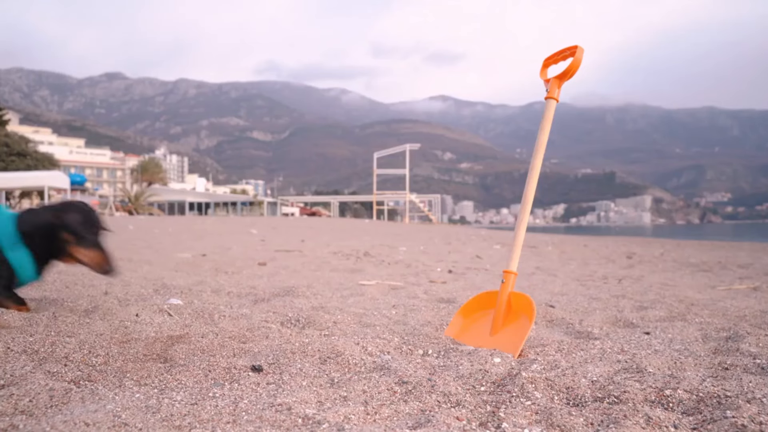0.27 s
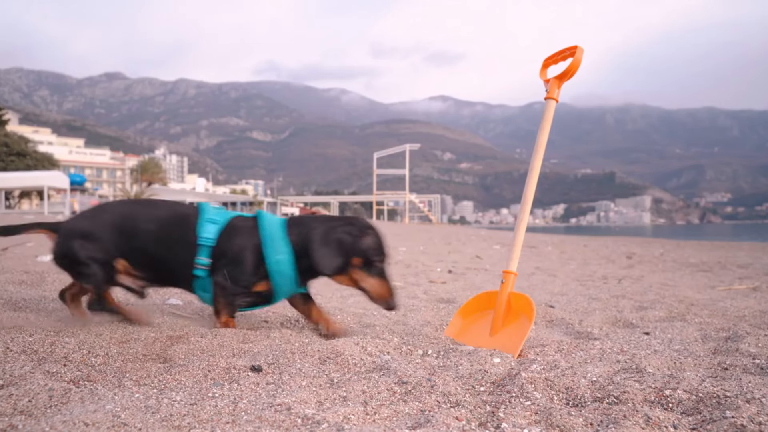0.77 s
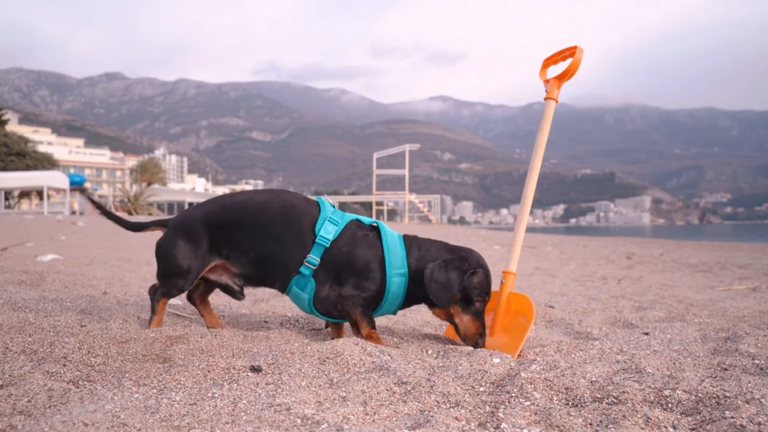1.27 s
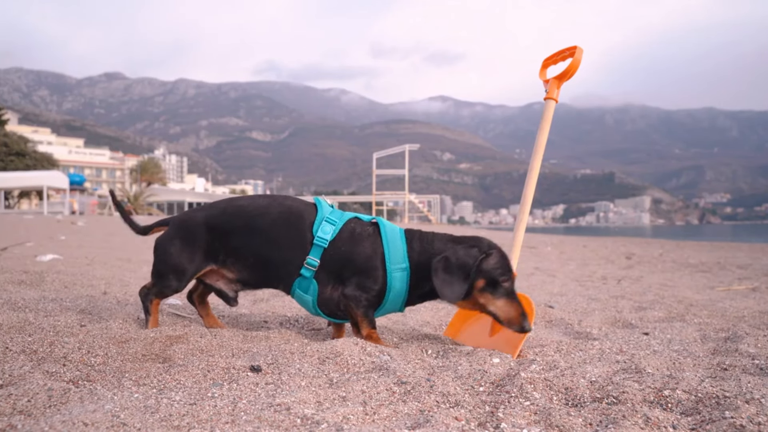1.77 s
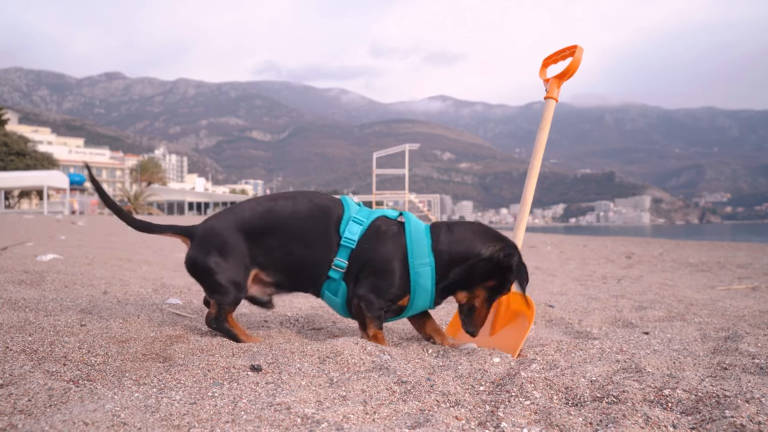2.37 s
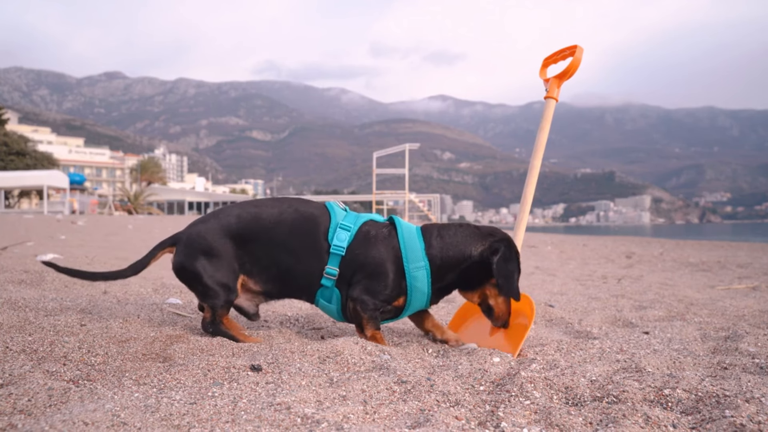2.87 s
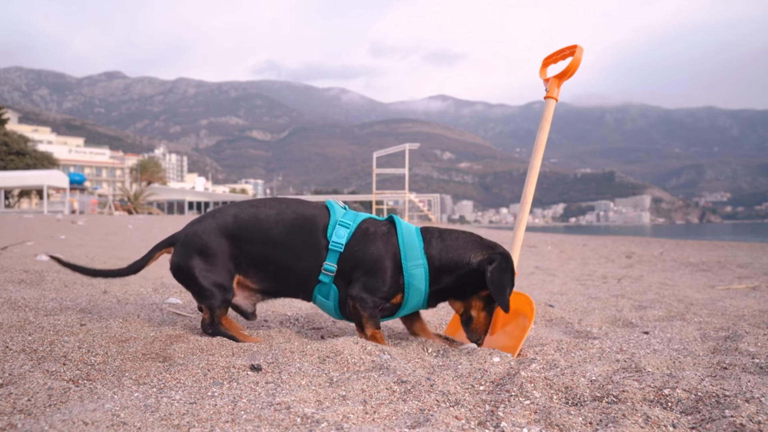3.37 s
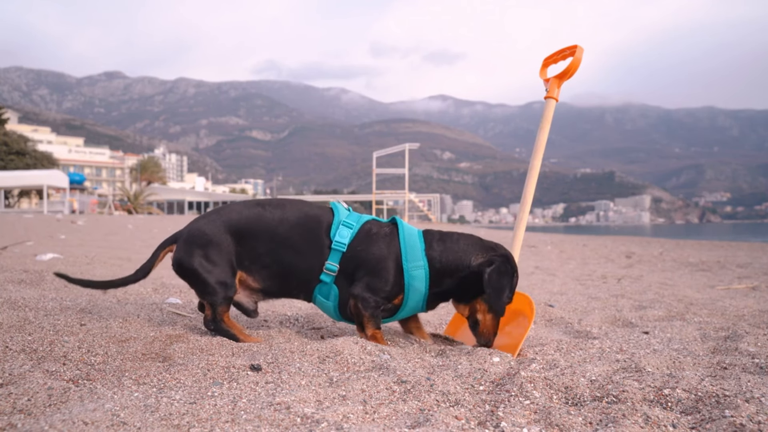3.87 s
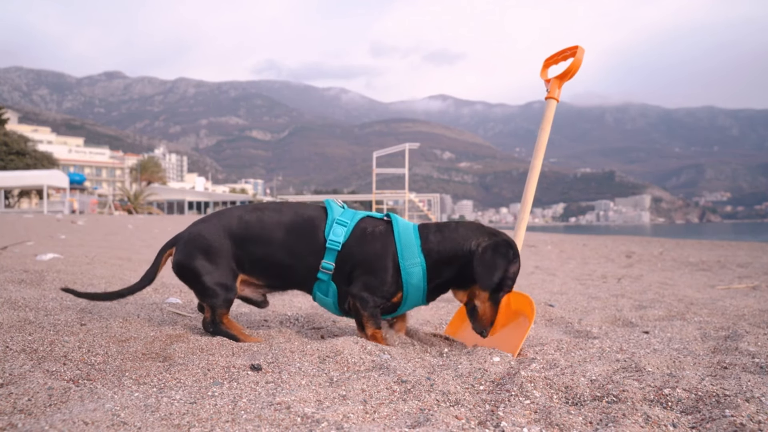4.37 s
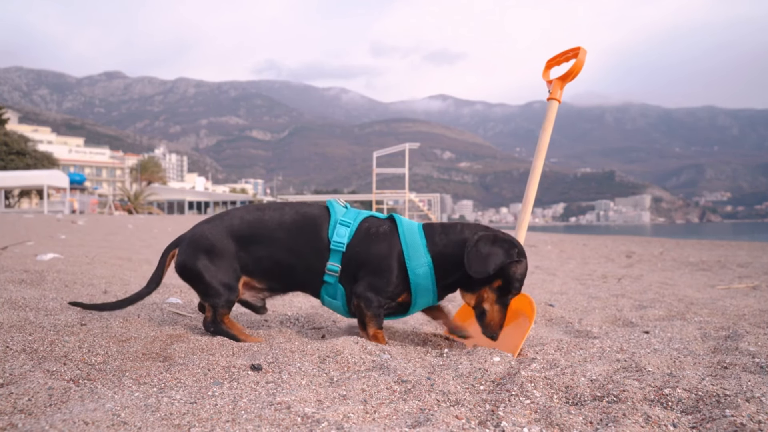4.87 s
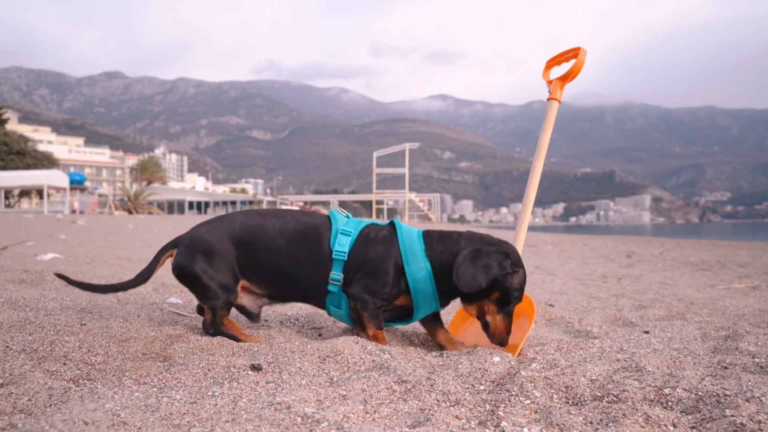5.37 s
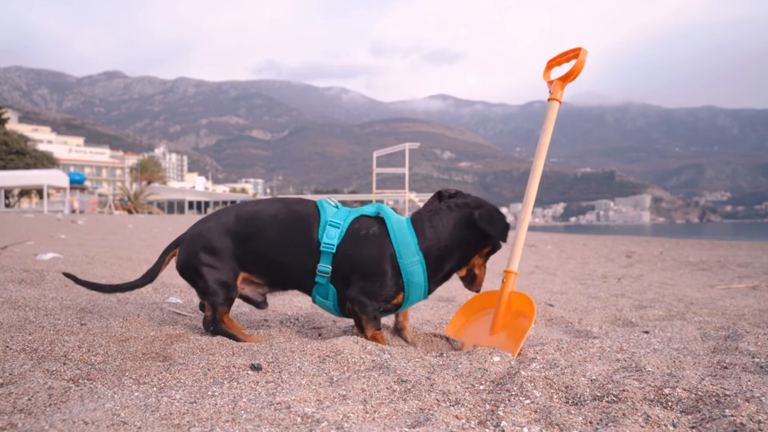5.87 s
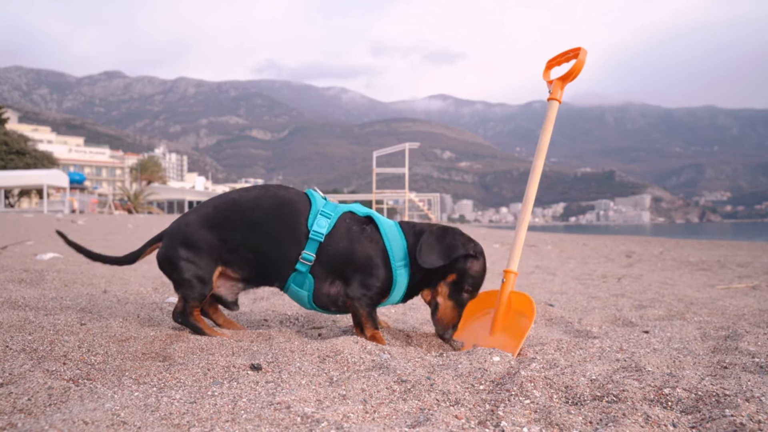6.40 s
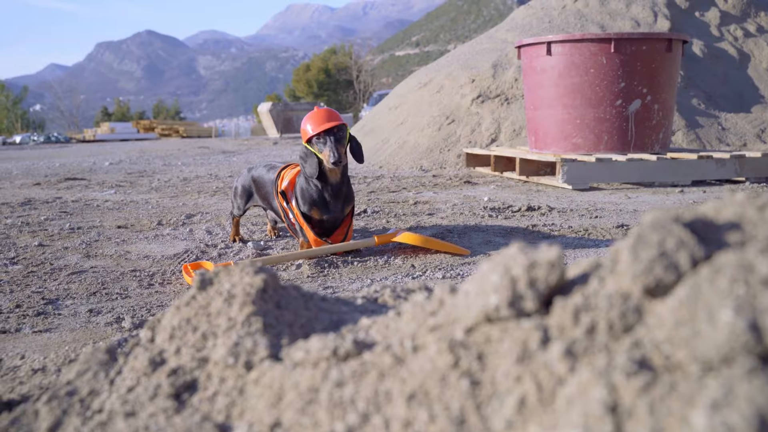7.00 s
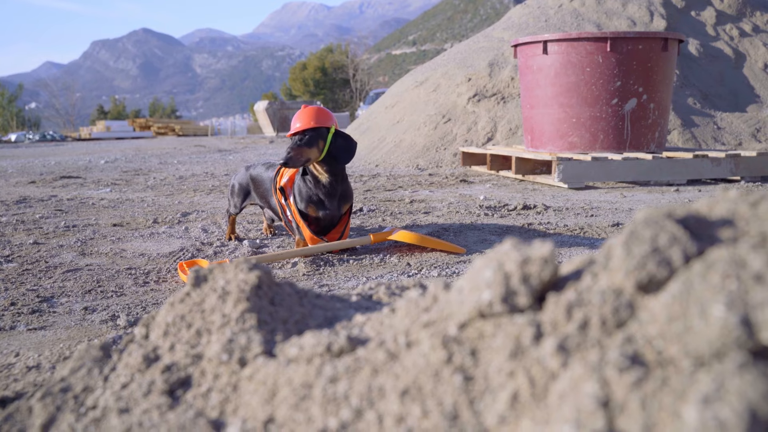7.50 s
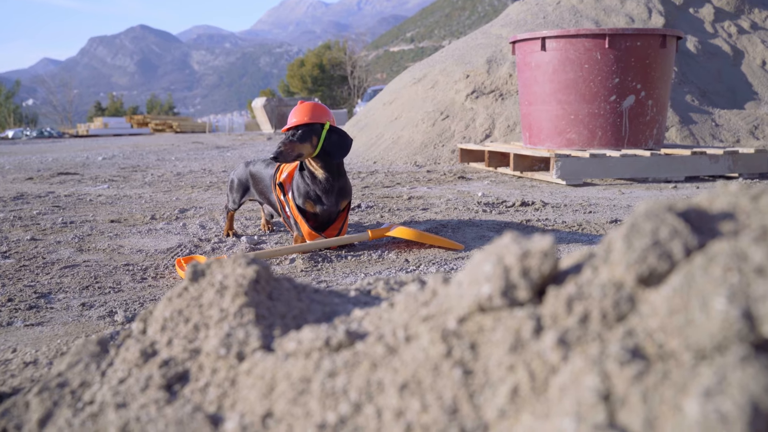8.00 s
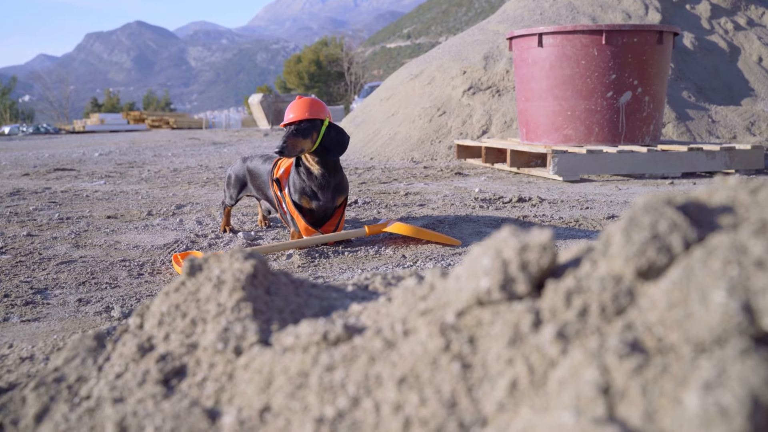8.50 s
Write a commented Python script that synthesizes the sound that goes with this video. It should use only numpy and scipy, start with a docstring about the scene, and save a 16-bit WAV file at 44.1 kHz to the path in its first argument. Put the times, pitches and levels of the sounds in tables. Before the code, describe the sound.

Close digging on a quiet beach: gritty scrapes ringing metallically, clattering pebbles, tumbling clods, and bursts of rapid hissing paw strokes through sand.

```python
"""Digging on a beach, close by, in almost still air with a faint low drone and a little wind.
First a shovel blade is shoved into gritty sand: random grain collisions, coloured and made to ring the blade.
It knocks on pebbles in short filtered bursts; damp clods tumble, loose sand slides and pebbles tick down.
Then paws rake dry sand in quick runs of hissing strokes, made of dense random grains.
Shoves and strokes go on in turn; twice the freed blade sings on as a fading tone, and the last grains settle."""
import sys
import numpy as np
from scipy import signal
from scipy.fft import rfft, irfft
from scipy.io import wavfile

SR = 44100
rng = np.random.default_rng(int(sys.argv[2]) if len(sys.argv) > 2 else 0)


def wav_record(signal):
    """Record a signal, one row per channel, as 16-bit PCM in the file named by sys.argv[1]."""
    frames = np.transpose(np.atleast_2d(signal))
    bounded = np.clip(frames, -1, 1)
    # unit amplitude maps onto the largest positive 16-bit level
    quanta = np.round(bounded * 32767).astype(np.int16)
    wavfile.write(sys.argv[1], SR, quanta)


N = 385786  # length of the scene in samples

# The tones that the blade can ring with, before sand and contact shift them:
# pitch_hz [Hz], width_hz [Hz, wider dies sooner], level_db [dB]
BLADE_MODES = [(442, 67, -8), (1020, 99, -1.5), (1424, 45, 5), (1570, 100, -8), (2015, 170, -13.5),
               (2086, 67, -1.5), (2330, 45, -9.5), (3110, 47, -4), (3435, 56, -1), (4020, 54, -5.5),
               (5650, 220, -2.5), (7700, 64, -6), (9480, 180, -1)]
# Shoves of the blade into the ground: start_s [s], end_s [s], grit_db [dB],
# fade_db [dB lost along the shove], rise_s [s], fall_s [s], fine_db [dB, fine sand over grit],
# clod_db [dB, clods over grit], clod_edge_hz [Hz, lower edge of the clods],
# ring_db [dB, ring of the blade], scatter_db [dB, spread of grain sizes]
SHOVE_TABLE = [(0.004, 0.054, -21.5, 9, 0.023, 0.008, 0, 0, 130, 8, 3),
               (0.601, 0.642, -29, -5, 0.018, 0.01, -1, -10, 220, 7.5, 2.5),
               (1.143, 1.258, -22, 5.5, 0.015, 0.063, -0.5, -8.5, 420, 1, 1.66),
               (2.676, 2.813, -31.5, 9, 0.0078, 0.088, 2, -17.5, 180, 5.5, 1.06),
               (4.043, 4.151, -33, -3.5, 0.005, 0.023, 5, -10.5, 171, 0, 1.5),
               (5.366, 5.438, -34.5, 3.5, 0.071, 0.059, -1, -19.5, 120, 10, 0),
               (6.46, 6.533, -26, 7.5, 0.0029, 0.017, 2, -14, 202.7, 11, 1.5),
               (7.039, 7.056, -29, -1.5, 0.025, 0.027, -2, -11, 400, 10.5, 2),
               (7.097, 7.148, -26.5, 2, 0.017, 0.056, -5, -6, 380, 10, 2),
               (7.329, 7.432, -38.5, 4.5, 0.066, 0.13, -4.5, -13.5, 250, 11, 1.5),
               (7.606, 7.658, -25.5, 1.5, 0.045, 0.082, -5, -2, 150, 1.5, 3.5),
               (8.129, 8.265, -31.5, 5, 0.014, 0.023, -7, -1.5, 612, -7, 1.5)]


def undb(db):
    """Turn decibels into gain."""
    return 10 ** (np.asarray(db) / 20)


def unit(x):
    """Scale to an rms (average strength) of 1."""
    return x / np.sqrt(np.mean(x ** 2))


def clock():
    """Time of every sample in seconds."""
    return np.arange(N) / SR


def walk(rate, size=N):
    """Random wandering: new values, rate per second, joined by straight lines; spread near 1."""
    steps = np.arange(size) * rate / SR
    count = int(steps[-1]) + 2
    return 1.2 * np.interp(steps, np.arange(count), rng.standard_normal(count))


def cut(x, hz, kind, order=2):
    """Keep what lies below hz ("low") or above it ("high")."""
    sections = signal.butter(order, min(hz, .45 * SR), kind, fs=SR, output="sos")
    return signal.sosfilt(sections, x)


def resonate(x, hz, width_hz):
    """One resonance, with gain 1 at its centre."""
    hz_limited = min(hz, .45 * SR)
    top, bottom = signal.iirpeak(hz_limited, hz / min(width_hz, SR / 4), fs=SR)
    return signal.lfilter(top, bottom, x)


def colour(x, points, size=2048):
    """Filter through (Hz, dB) points, never ahead of time, so that clicks keep their sharp front."""
    hz, db = np.transpose(points)
    bins = np.maximum(np.arange(size // 2 + 1), 1) * SR / size
    gain = undb(np.interp(np.log(bins), np.log(hz), db))
    # folding the cepstrum forward in time gives the filter with the earliest response
    cepstrum = irfft(np.log(gain))
    cepstrum[1:size // 2] *= 2
    cepstrum[size // 2 + 1:] = 0
    response = irfft(np.exp(rfft(cepstrum)))
    return signal.fftconvolve(x, response[None], axes=1)[:, :x.shape[1]]


def spread(x, width, treble_hz=2500, bass_hz=450, bass_share=2.1):
    """Give each grain its own direction in the treble and the bass; the middle stays central."""
    scattered = np.clip(width, 0, 1) * rng.standard_normal(len(x)) * x
    side = cut(scattered, treble_hz, "high") + bass_share * cut(scattered, bass_hz, "low")
    return np.array([x + side, x - side])


def grains(rate, scatter_db, size=N):
    """Random collisions, rate per second: many small, a few large."""
    out = np.zeros(size)
    when, strength, sign = rng.random((3, size))
    hit = when < rate / SR
    steps = np.minimum(-np.log(1 - strength[hit]), 4)
    out[hit] = undb(scatter_db * steps) * np.sign(sign[hit] - .5)
    return out


def add(out, s, sound):
    """Mix a short sound in at time s."""
    i = max(int(s * SR), 0)
    out[:, i:i + sound.shape[1]] += sound[:, :N - i]


def gesture(t, start, end, rise_s, fall_s, fade_db=0):
    """Gain that rises up to start, changes by -fade_db until end, and then dies away."""
    along = np.clip((t - start) / max(end - start, 1 / SR), 0, 1)
    before = np.maximum(start - t, 0) / rise_s
    after = np.maximum(t - end, 0) / fall_s
    return np.exp(-before - after) * undb(-fade_db * along)


def swell(t, crest, half_s):
    """Gain of a soft bell-shaped swell, about half as high at half_s from its crest."""
    return np.exp(1 - np.hypot(1, 1.37 * (t - crest) / half_s))


def still_air(level_db=-62.5, width=0.9):
    """Quiet air: coloured noise, partly different in each ear, whose level wanders."""
    # tone colour of the air: pitch_hz [Hz], level_db [dB]
    air_colour = [(25, -5), (64, -7), (108, -11), (175, -19), (223, -15.5), (624, -21), (1520, -26),
                  (4740, -31.5), (11900, -37.5), (16000, -40)]
    noise = rng.standard_normal(N) + width * rng.standard_normal((2, N))
    air = unit(colour(noise, air_colour)) * undb(level_db + walk(6.1))
    return cut(air, 9900, "low", order=1)


def drone(waver=0.012, upper_ratio=2.28, upper_db=-9):
    """A distant drone: two tones a fixed ratio apart, wavering in pitch and level."""
    # course of the lower tone, around which it wavers: time_s [s], pitch_hz [Hz], level_db [dB, both tones]
    drone_course = [(0, 122.5, -74), (4.6, 118.3, -73), (5.6, 98, -68.5), (8.702, 99.4, -69.5)]
    t = clock()
    s, hz, db = np.transpose(drone_course)
    pitch = np.interp(t, s, hz) * (1 + waver * walk(43))
    phase = 2 * np.pi * np.cumsum(pitch) / SR
    tones = np.sin(phase) + undb(upper_db) * np.sin(upper_ratio * phase)
    return unit(tones) * undb(np.interp(t, s, db) + 2 * walk(15))


def wind():
    """Soft buffets of wind on the microphone: swells of very low noise."""
    # buffets: crest_s [s], half_s [s, half length], level_db [dB]
    buffets = [(2.54, 0.029, -49), (2.637, .02, -44), (2.826, 0.059, -51), (2.916, 0.013, -47),
               (3.003, 0.022, -55.5), (3.115, 0.034, -58)]
    t = clock()
    gusts = sum(undb(db) * swell(t, crest, half_s) for crest, half_s, db in buffets)
    return unit(cut(rng.standard_normal((2, N)), 45, "low")) * gusts


def blade(x, contact_db=1.5, load=0.008, upper_db=-4, upper_width_hz=70, travel_db=3, travel_rate=22,
          drift=.008, drift_rate=16, count=20):
    """Ring of the blade: sand shifts its modes, which trade strength as the point of contact travels."""
    size = x.shape[1]
    chance = rng.standard_normal((len(BLADE_MODES), 2))
    main = 0
    for (hz, width_hz, db), (contact, shift) in zip(BLADE_MODES, chance):
        push = x * (1 + (undb(travel_db) - 1) * walk(travel_rate, size))
        main = main + undb(db + contact_db * contact) * resonate(push, hz * (1 + load * shift), width_hz)
    # the upper modes lie close together, and every contact picks out different ones
    upper = sum(resonate(x, hz, upper_width_hz) for hz in rng.uniform(2500, 14000, count))
    # as sand moves on the blade, the pitch of all modes wanders
    place = np.cumsum(1 + drift * walk(drift_rate, size))
    rings = main + undb(upper_db) * upper
    return np.array([np.interp(place, np.arange(size), ring) for ring in rings])


def stones(size, rate=60, width_hz=800, width=.14, count=14):
    """Small stones in the grit click at random, in a set of different pitches."""
    pitches = np.geomspace(1200, 11000, count) * np.exp(.1 * rng.standard_normal(count))
    clicks = np.array([resonate(grains(rate, 4, size=size), hz, width_hz) for hz in pitches])
    side = width * rng.standard_normal(count) @ clicks
    return unit(clicks.sum(axis=0) + np.array([side, -side]))


def crumble(size, edge_hz, width=.2, rate=1800):
    """Damp clods break in coarse, dull grains."""
    # tone colour of the clods: pitch_hz [Hz], level_db [dB]
    clod_colour = [(50, -16.5), (120, -5), (250, -10), (450, -5.5), (800, -0.5), (1050, -2.5), (1400, -2.5),
                   (2200, -17.5)]
    crumbs = colour(spread(grains(rate, 2.8, size=size), width), clod_colour)
    return unit(cut(cut(crumbs, edge_hz, "high"), 1800, "low", order=3))


def grind(size, fine_db, clod_db, edge_hz, ring_db, scatter_db, stones_db=-9, width=0.24, stick=0.92):
    """Grit, fine sand, small stones and clods grind along the blade and make it ring."""
    # tone colour of grit and ringing blade: pitch_hz [Hz], level_db [dB]
    grit_colour = [(590, -29.5), (1000, -9), (1180, -10), (1420, -5.5), (1870, -4.5), (2100, -7),
                   (5570, -10), (11700, -11.5), (16000, -18.5)]
    rub = spread(grains(6000, scatter_db, size=size), width)
    rub = unit(colour(rub + undb(ring_db) * blade(rub), grit_colour))
    # coarser ground holds more stones, heard as louder clicking
    rub = rub + undb(stones_db + scatter_db) * stones(size)
    grit = unit(cut(cut(rub, 1400, "high", order=3), 4900, "low", order=4))
    fine = unit(cut(cut(rub, 6000, "high", order=4), 15000, "low", order=1))
    clods = crumble(size, edge_hz)
    # the coarser the ground, the more the blade sticks and slips
    jerks = undb(stick * scatter_db * walk(110, size))
    return jerks * (grit + undb(fine_db) * fine + undb(clod_db) * clods)


def shovel(size=40000):
    """Each shove bites, grinds on through the ground and comes to rest."""
    out = np.zeros((2, N))
    for start, end, db, fade_db, rise_s, fall_s, fine_db, clod_db, edge_hz, ring_db, scatter_db in SHOVE_TABLE:
        t = max(start - .3, 0) + np.arange(size) / SR  # begins early, to leave room for the rise
        force = undb(db) * gesture(t, start, end, rise_s, fall_s, fade_db)
        add(out, t[0], force * grind(size, fine_db, clod_db, edge_hz, ring_db, scatter_db))
    return out


def settling(db=-67, settle_s=0.22):
    """With each shove the disturbed grains tick, and afterwards ever more faintly."""
    t = clock()
    unrest = sum(gesture(t, start, end, .01, settle_s) for start, end, *_ in SHOVE_TABLE)
    ticks = unit(resonate(spread(grains(320, 6), .35), 6000, 8000))
    return ticks * undb(db + 3 * walk(11)) * unrest


def knocks(thud_width_hz=430, ring_db=-3, body_db=-3.5, deep_s=.0058, ground_hz=270, ground_width_hz=110,
           ground_db=8, strike=3.2, top_hz=13000, size=6000):
    """A pebble strikes the blade and chatters on it: a crack, a thud in the ground and a short ring."""
    # knocks: start_s [s], strength_db [dB, scaled by the chatter], crack_db [dB over the thud],
    # thud_hz [Hz], crunch_s [s, time the chatter takes to die down], edge_hz [Hz, lower edge]
    knock_table = [(.008, -3.5, -16, 620, 0.0045, 70), (.049, -5.5, -11, 975, 0.0022, 60),
                   (.6407, 5.5, -4.5, 1202, 0.0039, 25), (1.131, -15.5, 1, 900, 0.0023, 150),
                   (1.145, -15, -8, 900, 0.0036, 200), (1.196, -7.5, 3, 1280, 0.003, 200),
                   (1.286, -15, -20, 1000, 0.0064, 400), (2.67, -29, 18, 1410, 0.0077, 200),
                   (4.1087, -2.5, -9, 1440, 0.0057, 170), (4.136, -8.5, 4.5, 1050, 0.0043, 120),
                   (4.157, -4.5, -3, 960, 0.0035, 201), (4.182, -25, -1.5, 1710, 0.01, 200),
                   (6.468, -13, 14, 1400, 0.0038, 200), (6.528, -17.5, 7, 850, 0.0043, 100),
                   (7.032, -11, -0.5, 1050, 0.006, 200), (7.047, -13, -18, 463, 0.0062, 200),
                   (7.126, -20.5, -10, 420, 0.0053, 90), (7.176, -21.5, -10, 1450, 0.0042, 200),
                   (7.5905, -9.5, -2, 1640, 0.0037, 300), (7.617, -10.5, -3.5, 1040, 0.0093, 400),
                   (7.66, -11.5, 1, 1400, 0.0053, 300), (7.667, 2.5, 0.5, 1010, 0.0024, 245),
                   (7.684, -14, -9, 1450, 0.0043, 400), (7.726, -6, -8, 950, .0016, 100),
                   (8.1238, 0.5, 2, 1700, 0.0023, 350), (8.2196, 5.5, -3.5, 1050, 0.00092, 500)]
    out = np.zeros((2, N))
    t = np.arange(size) / SR
    for s, db, crack_db, thud_hz, crunch_s, edge_hz in knock_table:
        chatter = rng.choice([-1, 1], size) * np.exp(-t / crunch_s) * (1 - np.exp(-t / 0.0016))
        strength = undb(db) * chatter.std()
        chatter[0] = strike * np.abs(chatter).max()  # the first strike stands out
        force = spread(chatter, .13)
        # a longer blow moves more of the ground and crushes finer, brighter grains
        depth = min(crunch_s / deep_s, 1)
        dull_force = cut(cut(force, 2200, "low"), 250, "high", order=1)
        thud = unit(resonate(dull_force, thud_hz, thud_width_hz))
        ground = undb(ground_db) * resonate(force, ground_hz, ground_width_hz)
        body = unit(cut(force, 990, "low") + ground) * depth ** 2
        ring = unit(blade(cut(force, 2300, "low", order=1)))
        crack = unit(cut(cut(force, 4100, "high"), 3400, "low"))
        blow = thud + undb(body_db) * body + undb(ring_db) * ring + undb(crack_db) * crack
        trimmed = cut(cut(blow, edge_hz, "high"), top_hz * np.sqrt(depth), "low")
        add(out, s, strength * unit(trimmed))
    return out


def tumbles(rise_s=.011, fall_s=0.013, size=15000):
    """Lifted clods drop and break up, each fall with its own range of pitches."""
    # falls: start_s [s], end_s [s], level_db [dB], low_hz [Hz, lower edge], high_hz [Hz, upper edge]
    clod_falls = [(0.05, 0.057, -35, 45, 130), (1.15, 1.22, -32, 324, 1510), (1.289, 1.295, -27, 497, 2500),
                  (1.366, 1.371, -38.5, 450, 1500), (4.112, 4.159, -25.5, 161, 743),
                  (5.445, 5.47, -50.5, 130, 493), (5.52, 5.583, -56, 130, 700),
                  (6.523, 6.535, -31.5, 111.6, 1494), (7.106, 7.133, -29.5, 109, 1104),
                  (7.461, 7.523, -31, 70, 856), (7.802, 7.815, -31, 405, 1490),
                  (7.879, 7.971, -44, 130, 498), (8.134, 8.196, -33, 407, 810)]
    out = np.zeros((2, N))
    for start, end, db, low_hz, high_hz in clod_falls:
        t = max(start - .1, 0) + np.arange(size) / SR
        clods = unit(cut(crumble(size, low_hz, width=.1), high_hz, "low"))
        add(out, t[0], undb(db) * gesture(t, start, end, rise_s, fall_s) * clods)
    return out


def slides(clod_db=-6, edge_hz=280, ring_db=7, scatter_db=2.0, size=26000):
    """A little loose sand runs off the blade under its own weight, in a soft swell."""
    # slides: crest_s [s], half_s [s, half length], grit_db [dB], fine_db [dB, fine sand over grit]
    slide_table = [(0.103, 0.035, -47.5, 1.5), (0.24, 0.017, -50, -2.5), (0.39, 0.045, -47, 0),
                   (0.497, 0.027, -49, -4), (0.711, 0.055, -47, -4), (0.909, 0.038, -50, -6.5),
                   (1.077, 0.042, -52, -3.5), (2.583, 0.035, -56, 1), (3.72, .05, -72, -5),
                   (4.247, 0.03, -52.5, -8), (4.557, 0.28, -69, -3), (5.647, 0.13, -62, 5),
                   (6.879, 0.065, -54, -0.5), (7.928, 0.036, -50.5, -6), (8.337, 0.05, -50, -12),
                   (8.565, 0.064, -56, -3)]
    out = np.zeros((2, N))
    for crest, half_s, db, fine_db in slide_table:
        t = max(crest - size / SR / 2, 0) + np.arange(size) / SR
        sand = grind(size, fine_db, clod_db, edge_hz, ring_db, scatter_db)
        add(out, t[0], undb(db) * swell(t, crest, half_s) * sand)
    return out


def pebbles(contact_s=0.0036, size=2000):
    """Loose pebbles drop back with a dry tick: a fading noise burst through a broad resonance."""
    # landings: start_s [s], strength_db [dB, scaled by the burst], pitch_hz [Hz]
    landings = [(0.324, -37.5, 7100), (0.716, -43, 3450), (0.792, -36, 1620), (2.246, -50, 1950),
                (2.35, -50.5, 4130), (5.087, -47, 806), (5.284, -40, 650), (5.368, -34, 2010),
                (5.564, -34, 2200), (5.605, -38.5, 4170), (5.855, -42.5, 4600), (5.919, -43.5, 3500),
                (7.335, -27, 1220), (7.549, -23.5, 2550), (8.68, -47.5, 4570), (8.713, -47, 6500)]
    out = np.zeros((2, N))
    t = np.arange(size) / SR
    for s, db, hz in landings:
        contact = rng.standard_normal(size) * np.exp(-t / contact_s)
        tick = resonate(spread(contact, 0.21), hz, 0.99 * hz)
        add(out, s, undb(db) * unit(tick) * contact.std())
    return out


def paws(rise_s=0.0078, fall_s=0.011, trickle_db=-27, trickle_s=0.064, bounce=0.37):
    """Each stroke shears a mass of fine grains; the thrown sand trickles down after it."""
    # strokes: start_s [s], end_s [s], level_db [dB, before the lower edge is cut],
    # fade_db [dB lost along the stroke], edge_hz [Hz, lower edge of the hiss]
    stroke_table = [(1.31, 1.388, -23, 3, 1600), (1.446, 1.563, -21.5, 4, 700),
                    (1.603, 1.711, -23.5, 0, 700), (1.76, 1.848, -22, 1.5, 704),
                    (1.868, 1.924, -34.5, -5, 700), (2.892, 2.898, -27.5, 3, 900),
                    (2.929, 2.981, -20, -1, 1200), (3.065, 3.176, -18.5, 3.5, 1100),
                    (3.246, 3.317, -18.5, 3, 1200), (4.813, 4.9, -22.5, 0.5, 2970),
                    (4.991, 5.05, -18.5, 6.5, 600), (5.13, 5.269, -19.5, 6.5, 805),
                    (6.554, 6.601, -36, 5.5, 900), (6.64, 6.712, -40.5, 5.5, 900)]
    # tone colour of dry sand: pitch_hz [Hz], level_db [dB]
    sand_colour = [(120, -60), (200, -26), (380, -31.5), (777, -27), (867, -29.5), (1530, -25), (2130, -13),
                   (3370, -7.5), (3830, -2.5), (4350, -5.5), (4860, 0), (6760, -4.5), (13100, -2.5),
                   (16000, -13)]
    t = clock()
    out = 0
    sand = unit(colour(spread(grains(26000, 2.26), 0.37, treble_hz=600), sand_colour))
    for start, end, db, fade_db, edge_hz in stroke_table:
        push = gesture(t, start, end, rise_s, fall_s, fade_db)
        trickle = undb(trickle_db) * gesture(t, start, end, rise_s, trickle_s, fade_db)
        # the wall of the hole throws the hiss back, from a different distance at each stroke
        delay = rng.integers(30, 110)  # samples
        hiss = sand + bounce * np.roll(sand, delay, axis=1)
        # a shallow stroke moves only the finest grains and lacks the lower hiss
        out = out + cut(hiss, edge_hz, "high", order=1) * (push + trickle) * undb(db)
    return out


def free_ring(damping=0.096, size=24000):
    """The blade slips free; with no sand to damp it, it sings on in its strongest mode."""
    # rings: start_s [s], level_db [dB, peak at the start]
    ring_table = [(2.671, -35.5), (5.429, -36)]
    out = np.zeros((2, N))
    t = np.arange(size) / SR
    hz, width_hz, _ = max(BLADE_MODES, key=lambda mode: mode[2])
    ring = np.sin(2 * np.pi * hz * t) * np.exp(-np.pi * width_hz * damping * t)
    for s, db in ring_table:
        add(out, s, undb(db) * np.array([ring, ring]))
    return out


def scene():
    """Open air: all sounds are simply added, with no echo around them."""
    surroundings = still_air() + drone() + wind()
    digging = shovel() + settling() + knocks() + tumbles() + slides()
    return surroundings + digging + pebbles() + paws() + free_ring()


def record(dry, top_hz=16000):
    """The recorder rounds off the loudest peaks and cuts the top."""
    rounded = dry / (1 + dry ** 4) ** (1 / 4)
    return signal.sosfilt(signal.ellip(10, .2, 80, top_hz, fs=SR, output="sos"), rounded)


dry = scene()
out = record(dry)
wav_record(out)
```